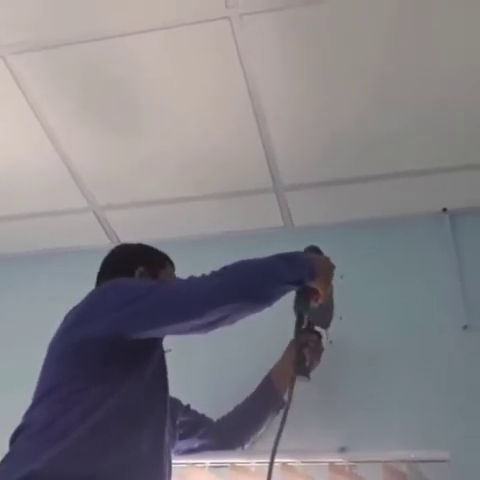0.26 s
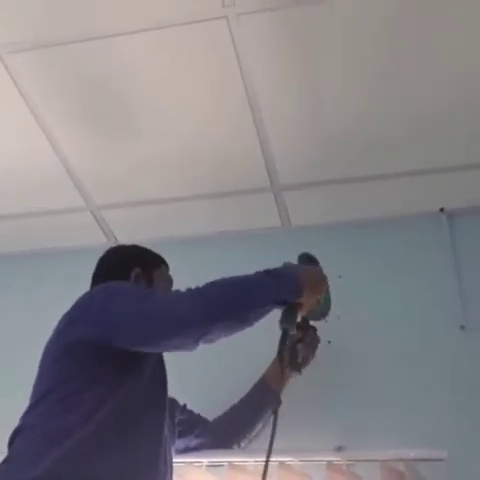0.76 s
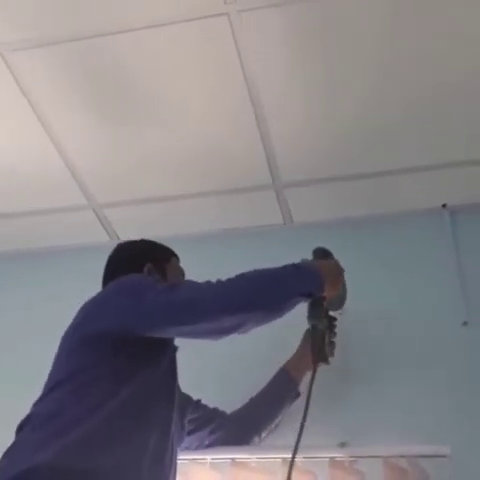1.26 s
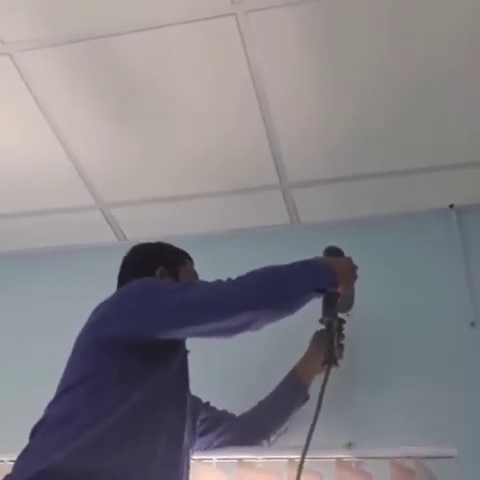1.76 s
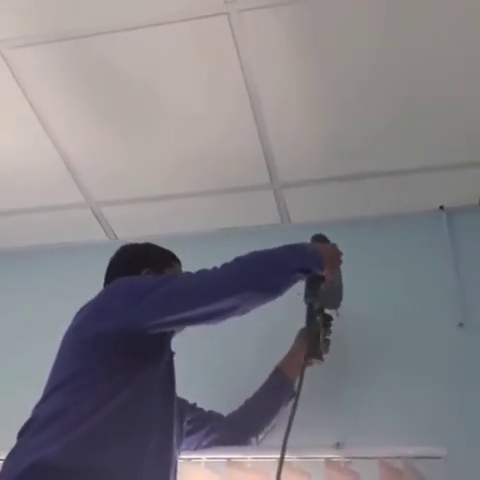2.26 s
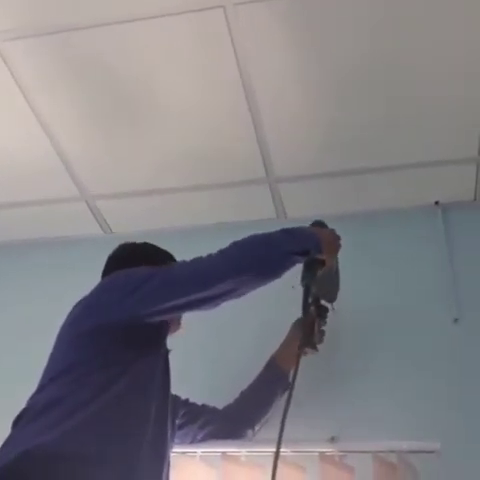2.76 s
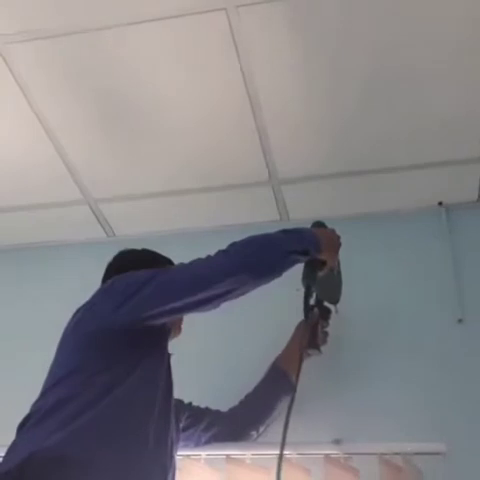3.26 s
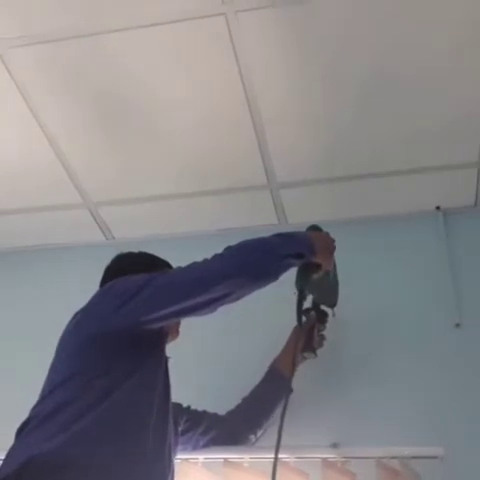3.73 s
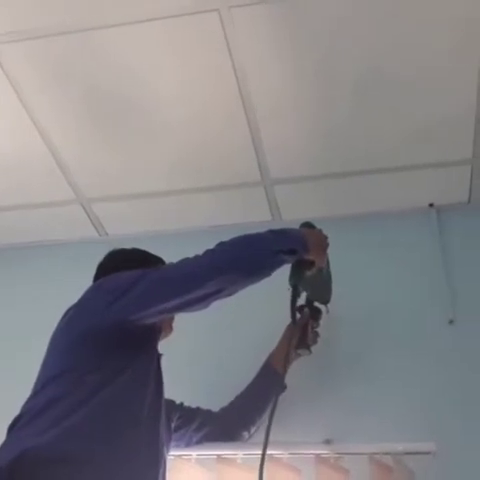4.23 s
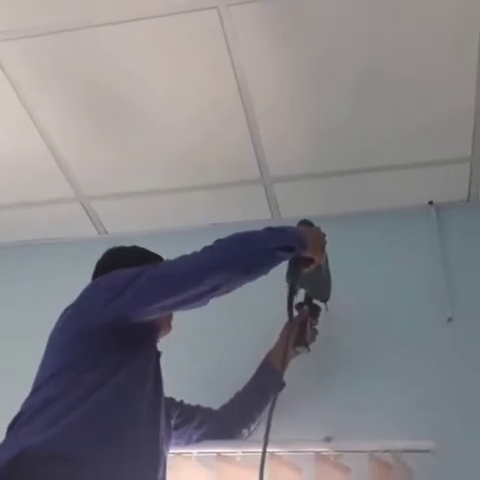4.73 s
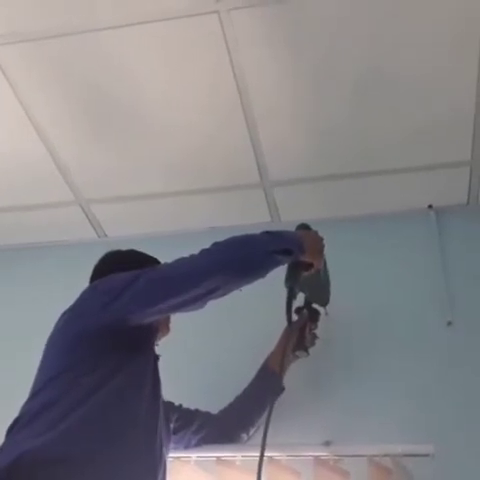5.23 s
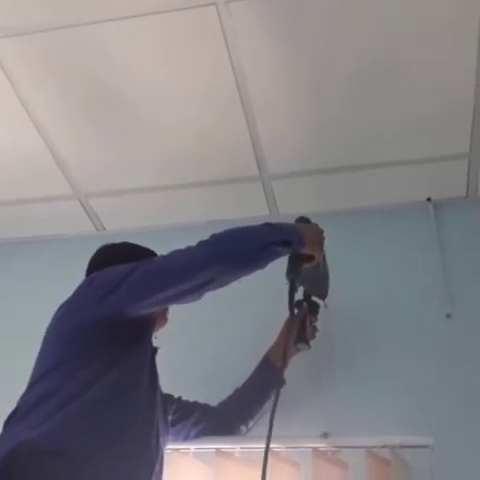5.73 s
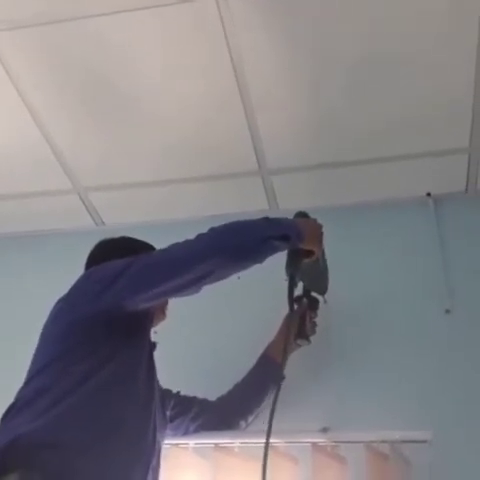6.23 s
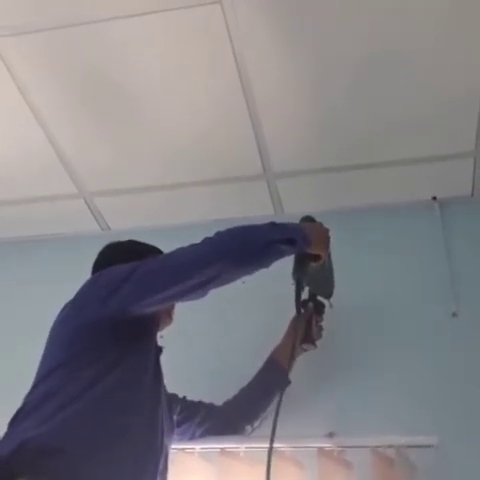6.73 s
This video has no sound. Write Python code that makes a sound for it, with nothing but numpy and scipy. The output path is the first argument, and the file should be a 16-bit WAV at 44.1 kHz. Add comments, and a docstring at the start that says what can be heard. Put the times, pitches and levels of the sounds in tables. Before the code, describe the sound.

A corded drill in a bare, reverberant room runs down with a falling whine and slowing rattle, stopping just after one second. Metallic knocks ring over it, then the idle bit scrapes and ticks on plaster. At three seconds short trigger squeezes revive it, pitch rising and sagging, until it grinds masonry loudly to the end. Phone microphone, rounded peaks, faint room hum.

```python
"""Drill on a masonry wall

A corded drill coasts to rest in a bare room, is knocked and scraped into place, then pumped up to speed by
short trigger squeezes. Shaft speed drives everything: sines at shaft multiples plus noise-modulated whine for
the motor, geared blows of random grains for gearbox rattle (through casing modes) and bit crunch (coloured noise).
Knocks ring decaying modes, scrapes gate fine grains; a phone hears it over coloured room noise and hum tones."""
import sys
import numpy as np
from scipy import signal
from scipy.fft import rfft, irfft
from scipy.io import wavfile
from scipy.ndimage import uniform_filter1d, map_coordinates

SR = 44100
rng = np.random.default_rng(int(sys.argv[2]) if len(sys.argv) > 2 else 0)


def unload_wav(signal):
    """Save mono or channel-first audio to the path in sys.argv[1] as 16-bit WAV at rate SR, clipped to [-1, 1]."""
    wavfile.write(
        sys.argv[1],
        SR,
        np.round(np.clip(np.atleast_2d(signal).T, -1, 1) * 32767).astype(np.int16),
    )


N = 308259
TIME = np.arange(N) / SR

# ringing of drill body and bit under load: pitch_hz, t60_s, level_db (relative)
BODY_MODES = [(402, 1, -33), (496, 0.63, -34), (824.6, 0.12, -11), (980, 0.093, -20), (1497, 0.16, -17),
              (1708, 0.045, -15), (1960, 0.069, -20), (2370, 0.077, -50)]
# spectrum of grit and dust: freq_hz, level_db (relative)
GRIT_SPECTRUM = [(1000, -32.5), (3000, 6), (4800, 4.5), (6300, 7.5), (7500, 7), (8700, 6.5), (9250, 6),
                 (9600, -6), (10300, 6.5), (11200, 3.5), (12400, 1.5)]
# trigger squeezes: pressed_s, released_s, target_turns_per_s
TRIGGER_SQUEEZES = [(3.0, 3.21, 245), (3.84, 4.096, 268.5), (4.477, 4.641, 358), (4.829, 4.938, 379),
                    (5.106, 5.261, 406), (5.351, 5.5, 418), (5.617, 5.767, 427), (5.889, 6.035, 418),
                    (6.158, 6.298, 413), (6.433, 6.617, 410), (6.672, 6.823, 419.5), (6.923, 7.051, 414)]


def undb(db):
    """Decibels to gain."""
    return 10 ** (np.asarray(db) / 20)


def unit(x):
    """Scale to rms 1."""
    return x / np.sqrt(np.mean(x ** 2))


def along(points, hz):
    """Read (Hz, value) points on a log-frequency axis."""
    f, value = np.transpose(points)
    return np.interp(np.log(hz + 1), np.log(f), value)


def colour(x, points):
    """Minimum-phase filter with the given spectrum, via the folded cepstrum."""
    size = 4096
    cepstrum = irfft(np.log(undb(along(points, np.fft.rfftfreq(size, 1 / SR)))))
    cepstrum[1:size // 2] *= 2
    cepstrum[size // 2 + 1:] = 0
    response = irfft(np.exp(rfft(cepstrum)))
    return signal.oaconvolve(x, response)[:len(x)]


def walk(rate_hz):
    """Random control signal, rms 1: straight lines between rate_hz random points a second."""
    points = rng.standard_normal(N // 8)
    return unit(map_coordinates(points, [TIME * rate_hz], order=1, mode="wrap"))


def grains(rate_hz, spread_db):
    """Random clicks of uneven size, rms 1."""
    hits = rng.random(N) < rate_hz / SR
    return unit(hits * rng.standard_normal(N) * undb(spread_db * rng.standard_normal(N)))


def body(push, ring_db=0):
    """A push on the drill sounds through the broad casing resonance and the narrow modes."""
    # freq_hz, level_db (relative)
    casing_spectrum = [(30, -36), (70, -32), (130, -21.5), (300, -12.5), (550, -8), (750, -4), (1200, -1),
                       (1800, 3.5), (2200, 2), (2700, -3), (4000, -9), (8000, -20.5), (12500, -36.5)]
    t = TIME[:SR // 2]
    casing = colour(signal.unit_impulse(len(t)), casing_spectrum)
    response = casing / np.linalg.norm(casing)
    for hz, t60_s, db in BODY_MODES:
        # each mode swings in step with the casing around it
        phase = np.angle(np.sum(casing * np.exp(-2j * np.pi * hz * t)))
        ring = np.cos(2 * np.pi * hz * t + phase) * np.exp(-np.log(1000) * t / t60_s)
        response = response + undb(db + ring_db) * ring / np.linalg.norm(ring)
    return signal.oaconvolve(push, response / np.linalg.norm(response))[:N]


def room(x, wet_db):
    """Direct sound plus a diffuse tail decaying at its own rate per band; each call draws new reflections."""
    # reverberation: centre_hz, t60_s
    band_decays = [(150, 0.2), (800, 0.72), (2000, 0.61), (5000, 0.42), (10000, 0.35)]
    t = TIME[:SR // 2]
    hz = np.fft.rfftfreq(len(t), 1 / SR)
    noise, tail = rfft(rng.standard_normal(len(t))), 0
    for centre_hz, t60_s in band_decays:
        share = along([(f, f == centre_hz) for f, _ in band_decays], hz)
        decay = np.exp(-np.log(1000) * t / t60_s)
        tail = tail + irfft(noise * share) * decay * np.sqrt(2 * np.log(1000) / (t60_s * SR))
    response = undb(wet_db) * tail * np.clip(t / 0.002, 0, 1)
    response[0] = 1
    return signal.oaconvolve(x, response)[:N] / np.sqrt(1 + undb(2 * wet_db))


def shaft():
    """Shaft turns/s and motor pull (0-1): squeezes spin it up, fast at first; friction and air slow it."""
    start_turns_per_s, friction_turns_per_s2, air_drag_s = 202, 140, 2.85

    def coast(speed, elapsed_s):
        """Run down under constant friction plus drag proportional to speed."""
        drag = friction_turns_per_s2 * air_drag_s
        return np.maximum((speed + drag) * np.exp(-elapsed_s / air_drag_s) - drag, 0)

    speed, pull = coast(start_turns_per_s, TIME), np.zeros(N)
    for pressed_s, released_s, top in TRIGGER_SQUEEZES:
        on, off = int(pressed_s * SR), int(released_s * SR)
        left = (released_s - TIME[on:off]) / (released_s - pressed_s)
        speed[on:off] = top - (top - speed[on]) * left ** 2
        speed[off:] = coast(top, TIME[off:] - released_s)
        pull[on:off] = 1
    return uniform_filter1d(np.array([speed, pull]), SR // 40)


def loudness(speed, stall_turns_per_s=3.0, engage_s=0.12):
    """Gains of rattle, grinding and whine by speed; they die at stall and build as the bit first engages."""
    # shaft_turns_per_s, gearbox_rattle_db, grinding_db, commutator_whine_db
    by_speed = [(0, -42.5, -53, -55), (36, -31, -42, -47), (103, -24, -31.5, -40), (141, -23.5, -28.5, -42),
                (192.5, -19.5, -22, -27), (265, -18, -18.5, -23.5), (360, -18, -18.5, -17),
                (381, -17, -18.5, -21.5), (430, -16.5, -17.5, -27)]
    speeds, *columns = np.transpose(by_speed)
    since_s = TIME - TRIGGER_SQUEEZES[0][0]
    # silent for engage_s before the first squeeze
    engaged = np.where(since_s < -engage_s, 1, np.clip(since_s / engage_s, 0, 1) ** 3)
    gains = np.array([undb(np.interp(speed, speeds, db)) for db in columns])
    return gains * np.tanh(speed / stall_turns_per_s) * engaged


def chatter(turns, per_turn, scatter_db, decay_s):
    """Uneven blows geared to the shaft; each leaves a short burst of agitation."""
    beat = np.floor(turns * per_turn + .15 * walk(200))
    blows = (np.diff(beat, prepend=0) > 0) * undb(scatter_db * rng.standard_normal(N))
    burst = signal.lfilter([1], [1, -np.exp(-1 / (decay_s * SR))], blows) + 0.54
    return burst / np.sqrt(uniform_filter1d(burst ** 2, SR // 12))  # level evened out


def motor(speed, turns, whine):
    """Gear, fan and commutator tones; brush bounce smears the whine into a rough band that grows with speed."""
    # multiple_of_shaft_rate, level_db (relative)
    orders = [(5, -5), (10, -3), (24, 4.5)]
    jitter_rad, flicker_db = 0.038, 3.2  # rms, jitter at the shaft
    angle = 2 * np.pi * turns + jitter_rad * walk(260)
    tones = sum(undb(db) * np.sin(order * angle) * undb(flicker_db * walk(70)) for order, db in orders)
    # noise around the 24th order
    bounce = walk(900) * np.sin(48 * np.pi * turns) + walk(900) * np.cos(48 * np.pi * turns)
    bounce_gain = undb(-2.0) * whine + undb(-32.5) * (speed / 400) ** 5
    return whine * unit(tones) + bounce_gain * bounce


def drilling(speed, blows, rattle, grind):
    """The chattering bit rattles the gearbox and crushes masonry in the same rhythm."""
    # freq_hz, level_db (relative)
    grind_spectrum = [(500, -40), (2200, -12.5), (3300, 0.5), (4300, -0.5), (5200, -2), (6400, 1),
                      (7800, 1.5), (8650, 4.5), (9150, -0.5), (9550, -6.5), (10100, -4.5), (10900, -4),
                      (12400, -12.5)]
    clatter = body(rattle * blows * grains(2500, 3.4), ring_db=-7.0)
    crunch = grind * blows * unit(colour(grains(3000, 2.6), grind_spectrum))
    # at speed the fan and the flying dust add a steady rush
    rush = (speed / 400) ** 3 * unit(colour(rng.standard_normal(N), GRIT_SPECTRUM))
    return undb(.5) * clatter + undb(2) * crunch + undb(-17.0) * rush


def background():
    """Low room noise and a wavering hum."""
    # pitch_hz, mean_level_db
    hum_tones = [(107.7, -70), (161.5, -52.5), (209.9, -58.5), (500.6, -64)]
    # freq_hz, level_db (relative)
    noise_spectrum = [(20, -8), (45, -13), (80, -5.5), (140, 2), (230, -0.5), (330, -4), (600, -9),
                      (1200, -15), (2200, -14.5), (3500, -19.5), (8500, -26), (12400, -37)]
    hum = 0
    for hz, db in hum_tones:
        gain = undb(db + 1.9 * walk(7.8)) * np.sqrt(2)
        hum = hum + gain * np.sin(2 * np.pi * hz * TIME + .5 * walk(9.9))
    return hum + undb(-48.5) * unit(colour(rng.standard_normal(N), noise_spectrum))


def knocks(decay_s=0.016):
    """Loose metal parts strike: a brief cluster of contacts, then the drill rings, longer than under load."""
    # knocks of bit and chuck: start_s, clack_db, ring_db (drive levels)
    strikes = [(0.41, -22, -38), (.707, -23, -35), (.779, -22.5, -37), (.864, -21, -40), (1.084, -32, -48),
               (1.49, -33.5, -40.5), (1.84, -37, -45), (1.929, -41, -46.5), (2.627, -40, -49),
               (3.575, -21, -33)]
    free_ring = 2.4  # t60 against the loaded drill
    blows, swings = np.zeros((2, N))
    for start_s, clack_db, ring_db in strikes:
        at = int(start_s * SR)
        blows[at], swings[at] = undb(clack_db), undb(ring_db)
    contacts = signal.lfilter([1], [1, -np.exp(-1 / (decay_s * SR))], blows) * grains(6000, 1.1)
    t = TIME[:SR // 2]
    strongest_db = max(db for _, _, db in BODY_MODES)
    ring = 0
    for hz, t60_s, db in BODY_MODES:
        # squared: a mode is both struck and heard in proportion to its strength
        swing = np.sin(2 * np.pi * hz * t) * np.exp(-np.log(1000) * t / (t60_s * free_ring))
        ring = ring + undb(db - strongest_db) ** 2 * swing
    clack = room(undb(-0.5) * body(contacts, ring_db=-26), wet_db=4.5)
    return clack + room(signal.oaconvolve(swings, ring)[:N], wet_db=3)


def strokes():
    """Gains of scraping and grit: each drag of the idle bit over the wall swells, holds and dies away."""
    # start_s, length_s, scraping_db, grit_db
    drags = [(1.22, 0.36, -57, -57), (1.825, 0.04, -45, -46), (1.922, 0.03, -50, -43),
             (2.14, 0.47, -55, -58), (2.33, 0.05, -55, -52.5), (2.42, 0.045, -48, -51),
             (2.612, 0.03, -43, -40), (2.66, 0.15, -41, -41), (2.84, 0.11, -54, -58),
             (3.015, 0.06, -52, -57)]
    attack_s, release_s = 0.011, 0.0094
    out = np.zeros((2, N))
    t = TIME[:SR]
    for start_s, length_s, scrape_db, grit_db in drags:
        shape = np.minimum(t / attack_s, 1) * np.exp(-np.maximum(t - length_s, 0) / release_s)
        start = int(start_s * SR)
        out[:, start:start + SR] += np.outer(undb([scrape_db, grit_db]), shape)
    return out


def placing(catch, scrape, grit):
    """The idle bit catches and slips over plaster: crumbs tick and the drill body answers."""
    crumbs = unit(grains(900, 0.73) * catch)
    answer = body(scrape * crumbs, ring_db=3.0)
    ticks = grit * unit(colour(crumbs, GRIT_SPECTRUM))
    return undb(0.5) * answer + undb(2.0) * ticks


def scene(count=6):
    """Casing, bit and wall radiate from several spots, each with its own echoes; both channels are alike."""
    # how hard the drill is leant on the wall: time_s, level_db
    lean = [(0.0, -0.1), (1.1, -0.1), (3.4, 1.0), (3.8, 0.4), (4.1, 0.56), (4.8, 1.4), (5.25, 1.9),
            (5.7, 0), (6.4, -0.7), (6.8, 1.5)]
    flutter_share, catch_db = 0.003, 1.6  # rms: shaft speed; bit catching on plaster
    pull_rattle_db, pull_grind_db = 0.38, 0.1  # the bit bites harder while the motor pulls
    speed, pull = shaft()
    turns = np.cumsum(speed * (1 + flutter_share * walk(60))) / SR
    rattle, grind, whine = loudness(speed)
    # the bite follows the lean and wavers as the bit meets harder and softer grains
    bite = undb(np.interp(TIME, *np.transpose(lean)) + 0.89 * walk(24))
    rattle = rattle * bite * undb(pull_rattle_db * pull)
    grind = grind * bite * undb(pull_grind_db * pull)
    blows = chatter(turns, per_turn=.4, scatter_db=4, decay_s=0.0058)
    catch = undb(catch_db * walk(44.82))
    scrape, grit = strokes()
    work = 0
    for _ in range(count):
        spot = drilling(speed, blows, rattle, grind) + placing(catch, scrape, grit)
        work = work + room(spot, wet_db=3.5) / np.sqrt(count)
    sound = work + room(motor(speed, turns, whine), wet_db=-3.0) + knocks() + background()
    return np.array([sound, sound])


def record(dry):
    """The phone rounds off the highest peaks, loses the deepest bass and cuts the top."""
    rounded = dry / (1 + dry ** 8) ** (1 / 8)
    sound = signal.sosfilt(signal.butter(2, 38, "highpass", fs=SR, output="sos"), rounded)
    return signal.sosfilt(signal.ellip(12, .1, 70, 12350, fs=SR, output="sos"), sound)


dry = scene()
out = record(dry)
unload_wav(out)
```